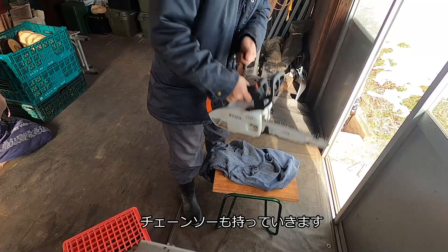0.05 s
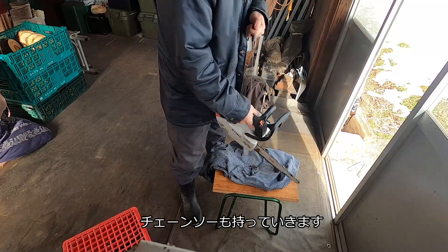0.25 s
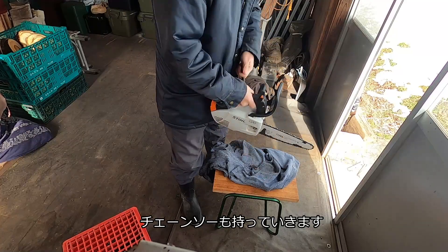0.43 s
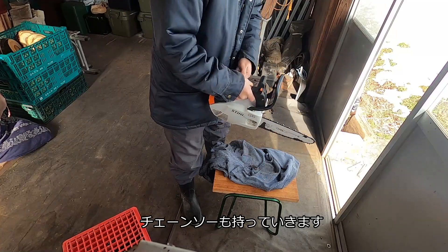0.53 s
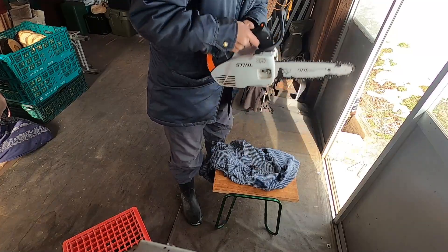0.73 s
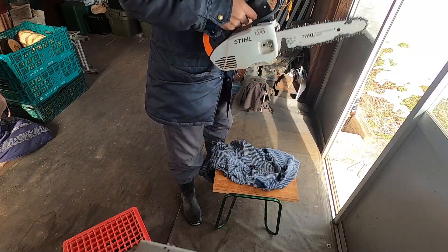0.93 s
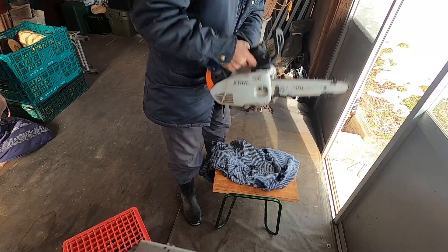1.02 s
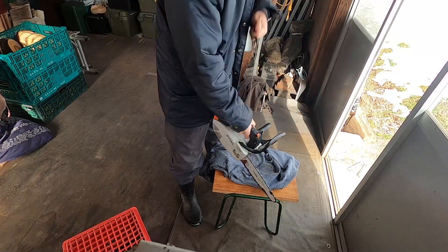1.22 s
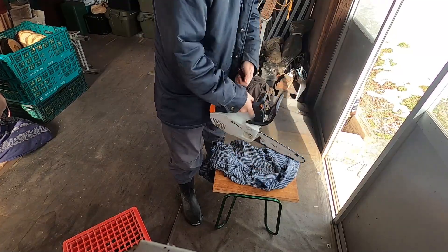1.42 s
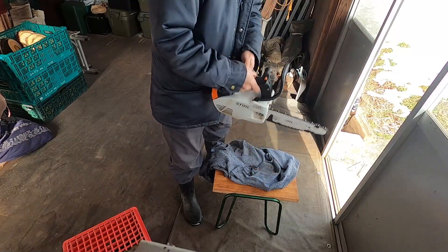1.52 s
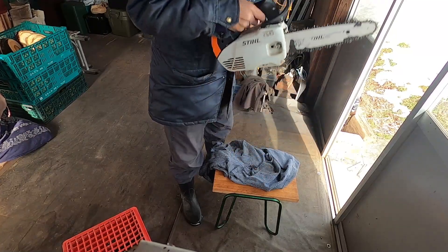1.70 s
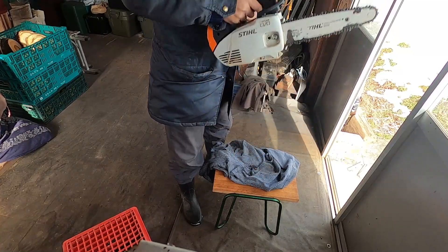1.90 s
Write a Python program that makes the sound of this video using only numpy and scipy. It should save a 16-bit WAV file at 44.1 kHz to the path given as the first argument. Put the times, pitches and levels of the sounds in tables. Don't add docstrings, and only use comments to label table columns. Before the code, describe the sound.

Chainsaw starter cord yanked two times, engine chugging briefly and failing, cord rewinding with rapid clicks.

```python
import sys
import numpy as np
from scipy import signal
from scipy.fft import rfft, irfft
from scipy.io import wavfile
from scipy.ndimage import uniform_filter1d, map_coordinates

SR = 44100
rng = np.random.default_rng(int(sys.argv[2]) if len(sys.argv) > 2 else 0)


def unload_wav(signal):
    wavfile.write(
        sys.argv[1],
        SR,
        np.round(np.clip(np.atleast_2d(signal).T, -1, 1) * 32767).astype(np.int16),
    )


def invert_db(x):
    u = np.asarray(x, float) / 20
    return 10 ** u


N = 85995
T = np.arange(N) / SR


def unit_rms(x):
    return x / np.sqrt(np.mean(x ** 2))


def high(x, hz):
    return signal.sosfilt(signal.butter(2, hz, "high", fs=SR, output="sos"), x)


def resonance(x, hz, width_hz):
    return signal.lfilter(*signal.iirpeak(hz, hz / width_hz, SR), x)


def body(x, modes, widen, skirt_db):
    out = 0
    for k, (hz, width_hz, db) in enumerate(modes):
        width = width_hz * widen
        peak = resonance(x, hz, width) / np.sqrt(width)
        skirt = resonance(x, hz, hz / 2) / np.sqrt(hz / 2)
        out = out + (-1) ** k * invert_db(db) * (peak + invert_db(skirt_db) * skirt)
    return out


def colour(x, points):
    f, db = np.array(points).T
    hz = np.fft.rfftfreq(x.shape[-1], 1 / SR) + 1
    gain = invert_db(np.interp(np.log(hz), np.log(f), db))
    return unit_rms(irfft(rfft(x) * gain, x.shape[-1]))


def curve(tables, column):
    gain = 0
    for table in tables:
        points = np.array(table)
        gain = gain + invert_db(np.interp(T, points[:, 0], points[:, column], -120, -120))
    return gain


def grit(spread_db):
    size_db = np.minimum(spread_db * rng.exponential(size=N), 24)
    return unit_rms(rng.standard_normal(N) * invert_db(size_db))


def walk(rate_hz):
    k = int(SR / rate_hz)
    steps = np.repeat(rng.standard_normal(N // k + 1), k)
    return 1.27 * uniform_filter1d(uniform_filter1d(steps, k), k)[:N]


def strikes(times, dbs, decays):
    rise_s = 0.0015
    out = np.zeros(N)
    for start, db, decay_s in zip(times, dbs, decays):
        u = np.maximum(T - start, 0)
        out += invert_db(db) * (1 - np.exp(-u / rise_s)) * np.exp(-u / decay_s)
    return out


# [t/s, level/dB]
SLEEVE_LEVEL = [
    (0, -53),
    (.1, -55),
    (.15, -44.5),
    (.75, -50),
    (.88, -49.5),
    (1.06, -59),
    (1.15, -52.5),
    (1.75, -49),
    (1.95, -56),
]
# [f/Hz, level/dB per Hz]
CLOTH_SPECTRUM = [(180, -1), (300, -7.5), (459, -2), (550, -4.5), (1040, 1), (3380, -3.5), (8190, -15.5),
                  (15000, -35)]
# [f/Hz, level/dB]
YARD_SPECTRUM = [(12, -36), (20, -19), (70, 6), (97, -5.5), (176, -3), (241, -11.5), (344, -39), (464, -15),
                 (600, -67), (780, -65), (1320, -120)]


def background():
    yard_db, swell_db = -52.5, 2.5
    friction = np.array([grit(0.5), grit(0.61)])
    cloth = colour(friction, CLOTH_SPECTRUM) * invert_db(0.61 * walk(27.1)) * curve([SLEEVE_LEVEL], column=1)
    rumble = colour(rng.standard_normal(N), YARD_SPECTRUM + [(900, -80)])
    return cloth + rumble * invert_db(yard_db + swell_db * walk(12.04))


# [t/s, peak level/dB, low share level/dB, length/s]
CLACKS = [(0.1208, -27, -22.5, 0.011), (0.2113, -21.5, 15.5, 0.0085), (0.2364, -7.5, -5.5, 0.0045),
          (0.2878, -17.5, 7, 0.0065), (0.3284, -18, 14, 0.0026), (0.351, -28, 15, 0.0049),
          (0.366, -20, -19, 0.0045), (1.097, -34.5, -14, 0.0047), (1.199, -9, 2, 0.0065),
          (1.2683, -6.5, 0.5, 0.0031), (1.3294, -6.5, 0, 0.0051)]
# [f/Hz, width/Hz, level/dB]
HOUSING_MODES = [(852, 183, 2.5), (1197, 67, 3.5), (1708, 99, -0.5), (2173, 39, 2), (2710, 100, 2.5),
                 (3500, 130, 4), (4210, 160, 3), (5080, 180, 1), (6300, 900, -6.5), (9600, 900, -19.5)]
# [t/s, gas level/dB, rattle level/dB, body heave level/dB]
PULLS = [
    [(.16, -72, -64.5, -49), (.2, -52, -32, -53), (.235, -21.5, -25, -42), (.255, -22, -21, -21),
     (.31, -23, -28, -29), (.37, -31.5, -32.5, -38), (.42, -42, -37.5, -35), (.48, -73, -82, -57)],
    [(1.14, -70, -60.5, -70), (1.19, -65, -45.5, -60), (1.225, -43.5, -35, -43), (1.25, -19.5, -27, -30.5),
     (1.32, -20, -17.5, -27.5), (1.37, -29.5, -31.5, -31.5), (1.41, -57, -27.5, -52),
     (1.48, -46, -42.5, -62)],
]
# [t/s, level/dB]
CORD_SNAPS = [
    (.205, -25.5),
]


def flywheel():
    rattle = unit_rms(body(grit(4.13), HOUSING_MODES, 4.7, 2))
    rattle = rattle * invert_db(3.6 * walk(90)) * curve(PULLS, column=2)

    times, db, low_db, length_s = np.array(CLACKS).T
    bright = body(grit(1.35) * strikes(times, db, length_s), HOUSING_MODES[3:] + PAWL_MODES[3:5], 2.3, 0)
    dull = body(grit(6.0) * strikes(times, db + low_db, length_s), HOUSING_MODES[:3], 2.3, -11.5)
    clacks = high(invert_db(25) * bright + invert_db(28) * dull, 330)

    snap_hz, rise_hz_per_s, snap_s = 2380, 53000, 0.0053
    snap = np.zeros(N)
    for centre, snap_db in CORD_SNAPS:
        u = T - centre
        cycles = u * (snap_hz + rise_hz_per_s / 2 * u)
        snap += invert_db(snap_db) * np.exp(-(u / snap_s) ** 2) * np.sin(2 * np.pi * cycles)
    return rattle + clacks + snap * invert_db(5.3 * walk(500))


# [t/s, peak level/dB, push length/ms]
PUFFS = [(0.247, -3.5, 0.47), (0.261, -0.5, 0.75), (0.285, -1.5, 0.61), (0.3, -3, 0.54), (0.331, -3, 0.37),
         (0.342, -6.5, 0.5), (0.358, -16, 0.59), (0.415, -24.5, 0.87), (1.245, -3.5, 0.48),
         (1.263, -11.5, 0.54), (1.266, -7.5, 0.34), (1.279, -6, 0.63), (1.298, -1, 0.37),
         (1.311, -1.5, 0.48), (1.349, -9.5, 0.7), (1.36, -12.5, 0.31)]
# [f/Hz, width/Hz, level/dB]
MUFFLER_MODES = [(246.3, 12.3, 3), (401, 35, -0.5), (522, 80, -3.5), (722, 90, -6.5), (925, 59, -11.5)]


def piston():
    push = np.zeros(N)
    for start, db, length_ms in PUFFS:
        u = (T - start - .001) * 1000 / length_ms
        push += invert_db(db) * u * np.exp(-u ** 2)
    ring = body(push, MUFFLER_MODES, 0.74, -23.5)
    puffs = 1.14 * push + 0.29 * ring * np.abs(push).max() / np.abs(ring).max()

    gas = unit_rms(body(grit(2.84), MUFFLER_MODES, 1.45, -3.5))
    gas = gas * invert_db(2.4 * walk(70)) * curve(PULLS, column=1)

    heave_hz = 55
    heave = resonance(resonance(rng.standard_normal(N), heave_hz, 57), heave_hz, 78)
    return puffs + gas + unit_rms(heave) * curve(PULLS, column=3)


# [t/s, peak level/dB, low share level/dB]
TEETH = [(0.408, -23, -23), (0.4374, -51, -5), (0.4919, -20.5, -8), (0.5115, -20.5, -5), (0.5265, -19, -8),
         (0.5435, -16, -11.5), (0.5554, -22.5, -9), (0.5682, -15, -8.5), (0.581, -20.5, -8),
         (0.5954, -21.5, -14), (0.6015, -21.5, -14), (0.6148, -19, -15), (0.6394, -20.5, -9.5),
         (1.3898, -16, -2), (1.4004, -18, -11), (1.4243, -17.5, -11.5), (1.4394, -21.5, -12),
         (1.4512, -25.5, -16), (1.4634, -16, -21), (1.4803, -19, -9.5), (1.4974, -20.5, -3.5),
         (1.5138, -22.5, -3.5), (1.5285, -19, -7.5), (1.546, -18.5, -7), (1.5635, -19.5, -9),
         (1.5812, -18.5, -13), (1.6012, -23.5, -8), (1.6366, -21, -4.5)]
# [f/Hz, width/Hz, level/dB]
PAWL_MODES = [(4300, 140, 0), (4735, 200, 6.5), (5110, 100, -1), (6690, 134, -2), (8700, 120, -12),
              (11500, 1700, -18.5)]
# [f/Hz, width/Hz, level/dB]
SPOOL_MODES = [(761, 190, 1.5), (1120, 230, -0.5), (1650, 43, 2), (2276, 190, 0), (2970, 300, 3.5)]
# [t/s, level/dB]
REWINDS = [
    [(.485, -53), (.495, -36), (.58, -37), (.64, -35), (.72, -47)],
    [(1.37, -50), (1.39, -31.5), (1.5, -33.5), (1.61, -35.5), (1.63, -51), (1.7, -72)],
]


def tooth_hits(times, dbs):
    decay_s, bounce_s, bounce_db = np.full(len(times), .003), .005, -8
    clicks = strikes(times, dbs, decay_s)
    bounces = strikes(times + bounce_s, dbs + bounce_db, decay_s)
    return grit(1.6) * (clicks + bounces)


def ratchet():
    times, db, low_db = np.array(TEETH).T
    scatter_db = 2 * rng.standard_normal((12, len(times)))
    pawls = spool = 0
    for k, mode in enumerate(PAWL_MODES):
        pawls = pawls + body(tooth_hits(times, db + scatter_db[k]), [mode], 1.0, -15)
    for k, mode in enumerate(SPOOL_MODES):
        spool = spool + body(tooth_hits(times, db + low_db + scatter_db[-k - 1]), [mode], 0.73, -8)

    pawl_slide = unit_rms(body(grit(2.3), PAWL_MODES, 1.5, 0))
    spool_slide = unit_rms(body(grit(3.3), SPOOL_MODES, 1.4, 0))
    slide = unit_rms(pawl_slide + invert_db(0.5) * spool_slide) * curve(REWINDS, column=1)
    return high(invert_db(33) * pawls + invert_db(35.5) * spool + slide, 550)


# [t/s, peak level/dB, upper modes level/dB, contact/s]
KNOCKS = [
    (0.6543, -10.5, -3.5, 0.0046),
    (1.6513, -22.5, 3, 0.0016),
]
# [f/Hz, level/dB, t60/s]
HANDLE_MODES = [(745, -6.5, 0.024), (935, 0, 0.0089), (1483, -7.5, 0.021), (458, -17, 0.054),
                (1760, -4.5, 0.024), (3420, -6.5, 0.014)]


def handle():
    rise_s = 0.00068
    out = np.zeros(N)
    for start, db, upper_db, contact_s in KNOCKS:
        for late_s, hop_db, lift_db in [(0, -0.5, 4.5), (.008, -14, 10)]:
            u = np.maximum(T - start - late_s, 0)
            for k, (hz, mode_db, t60_s) in enumerate(HANDLE_MODES):
                held_s = contact_s * (k < 3)
                decay = np.exp(-np.log(1000) * np.maximum(u - held_s, 0) / t60_s)
                shape = np.minimum(u / rise_s, 1) * decay
                peak_db = db + hop_db + mode_db + (upper_db + lift_db) * (k > 1)
                out += (-1) ** k * invert_db(peak_db) * np.sin(2 * np.pi * hz * u) * shape
    times, dbs = np.array(KNOCKS).T[:2]
    rattle = unit_rms(resonance(resonance(grit(2.3), 1100, 1600), 980, 2500))
    rattle = rattle * strikes(times, dbs, [.02, .02])
    return high(out + invert_db(-11.5) * rattle, 355)


# [f/Hz, t60/s, level/dB]
SHED_BANDS = [(158.4, 0.19, 0), (508, 0.27, 3.5), (1500, 0.3, -1.5), (4000, 0.39, -0.5), (10000, 0.2, 4)]


def unit_energy(response):
    return response / np.sqrt(np.sum(response ** 2) / 2)


def shed(x):
    shed_db, first_wall_s = -8, 0.0053
    near_db, near_hz, near_t60_s = -4, 5500, .03
    u = T[:SR // 2]
    tail = 0
    for hz, t60_s, db in SHED_BANDS:
        mid, side = resonance(rng.standard_normal((2, len(u))), hz, hz * 1.4)
        spread = min(hz / 2500, 1) * side * np.array([[1], [-1]])
        tail = tail + invert_db(db) * (mid + spread) * np.exp(-np.log(1000) * u / t60_s)
    tail = tail * (u > first_wall_s)
    near = high(rng.standard_normal((2, len(u))), near_hz)
    near = near * np.exp(-np.log(1000) * u / near_t60_s) * (u > .0007)
    response = invert_db(shed_db) * unit_energy(tail) + invert_db(near_db) * unit_energy(near)
    return signal.fftconvolve(x[None], response, axes=1)[:, :N]


def ports(x):
    lag_s, left_db, top_side_db, top_side_hz = 4.5e-5, 2, -5, 6000
    hz = np.fft.rfftfreq(N, 1 / SR)
    tilt_db = left_db + top_side_db * hz ** 2 / (hz ** 2 + top_side_hz ** 2)
    phase = np.pi * hz * lag_s / np.sqrt(1 + (hz / 6000) ** 2)
    turn = invert_db(tilt_db / 2) * np.exp(-1j * phase)
    return irfft(rfft(x) * np.array([turn, 1 / turn]), N)


def scene():
    saw = piston() + flywheel() + ratchet()
    saw = signal.sosfilt(signal.butter(3, 10230, fs=SR, output="sos"), saw)
    knock = handle()
    left, right = ports(saw + knock + shed(saw + invert_db(0.5) * knock))
    sway_s = 2.2e-5 * walk(14.08)
    right = map_coordinates(right, [(T + sway_s) * SR], mode="mirror")
    return np.array([left, right]) + background()


def low_pass(x):
    return signal.sosfilt(signal.butter(12, 16500, fs=SR, output="sos"), x)


def record(dry):
    return low_pass(dry)


dry = scene()
out = record(dry)
unload_wav(out)
```